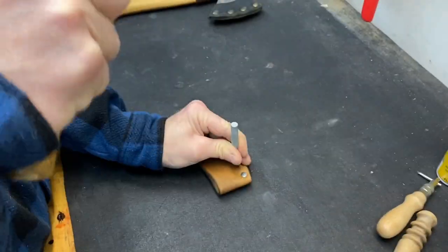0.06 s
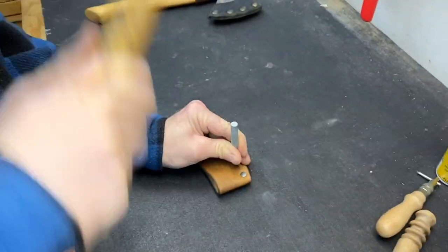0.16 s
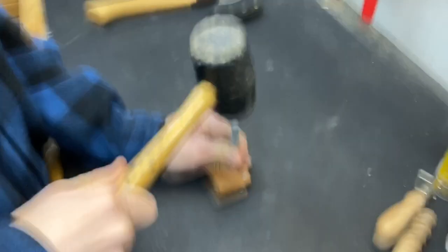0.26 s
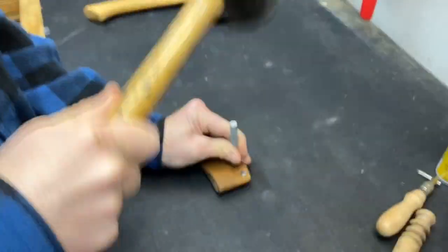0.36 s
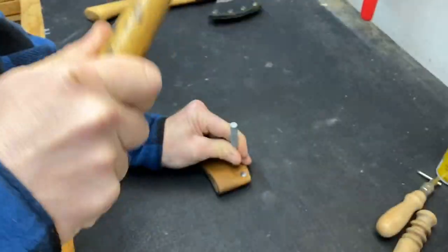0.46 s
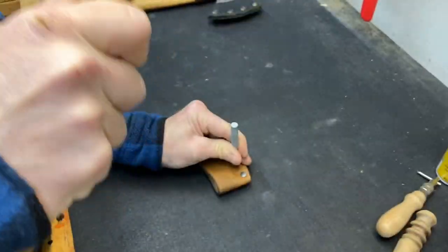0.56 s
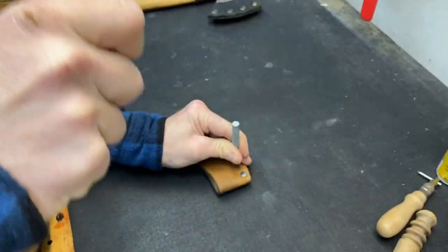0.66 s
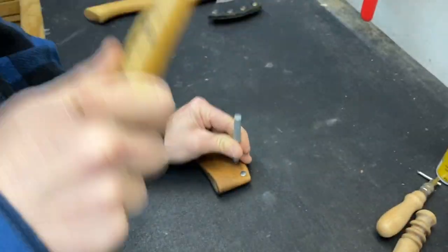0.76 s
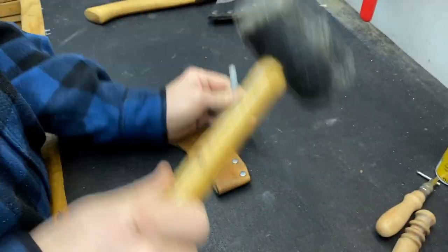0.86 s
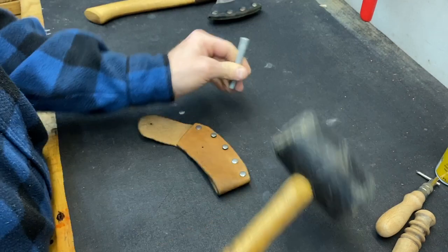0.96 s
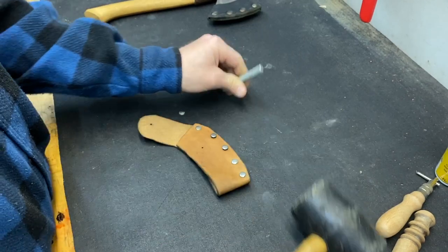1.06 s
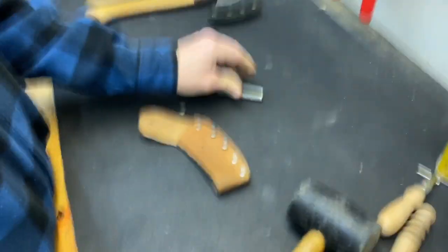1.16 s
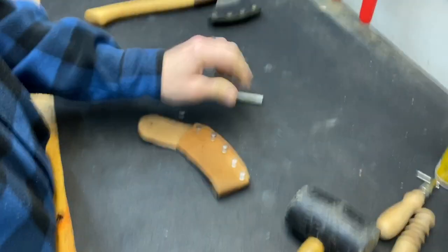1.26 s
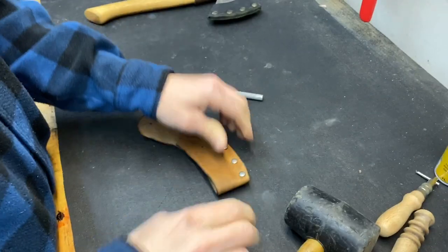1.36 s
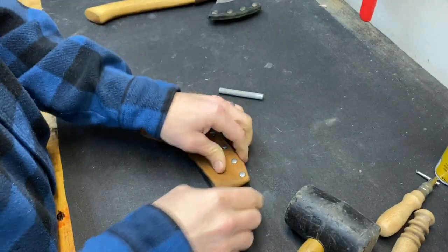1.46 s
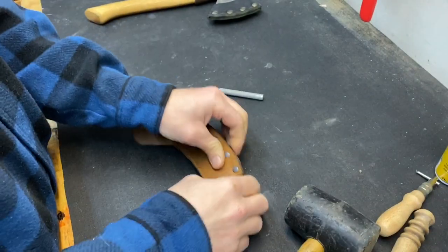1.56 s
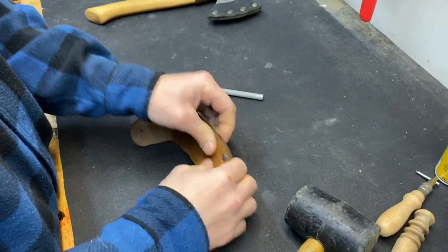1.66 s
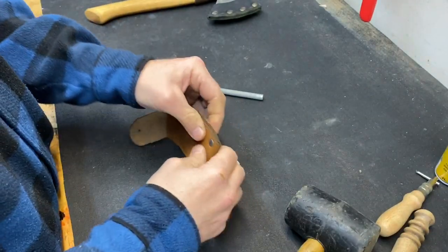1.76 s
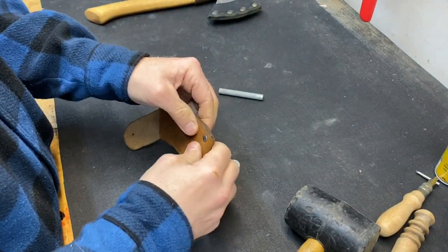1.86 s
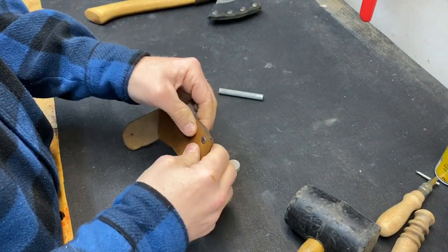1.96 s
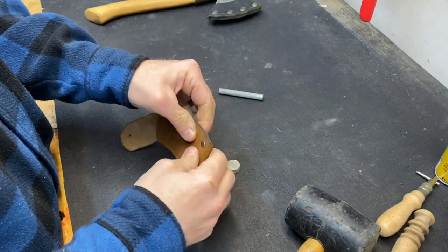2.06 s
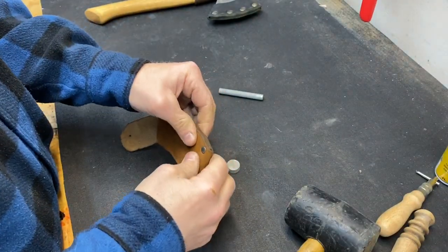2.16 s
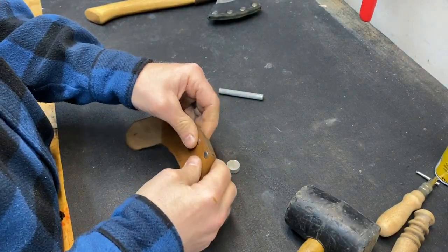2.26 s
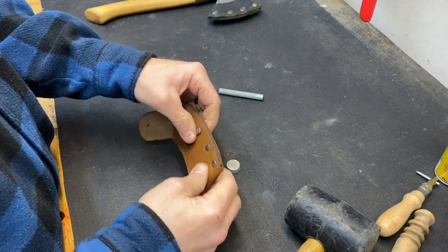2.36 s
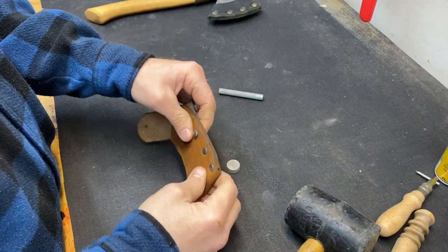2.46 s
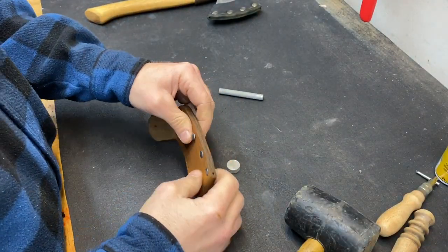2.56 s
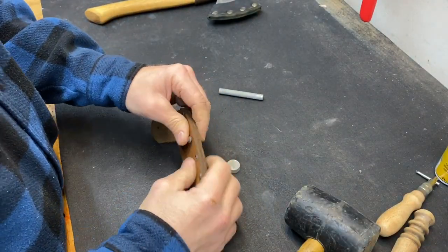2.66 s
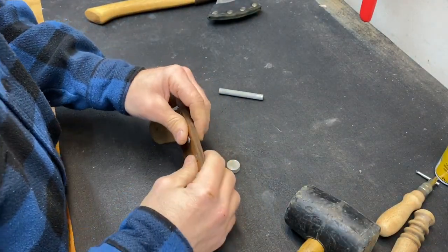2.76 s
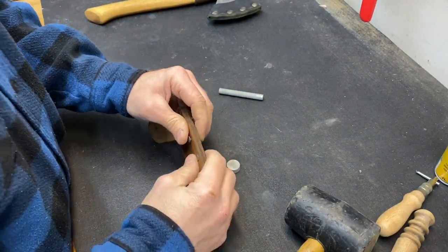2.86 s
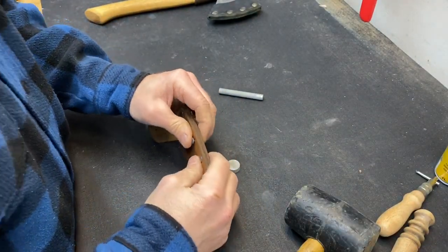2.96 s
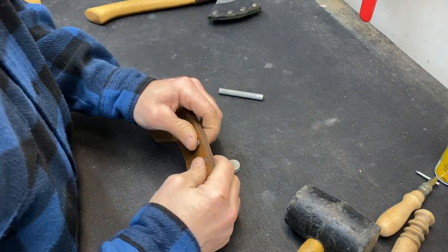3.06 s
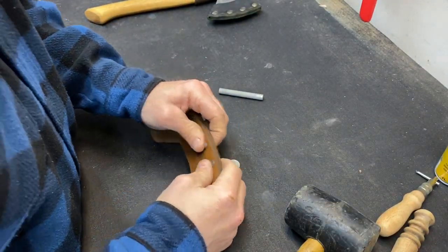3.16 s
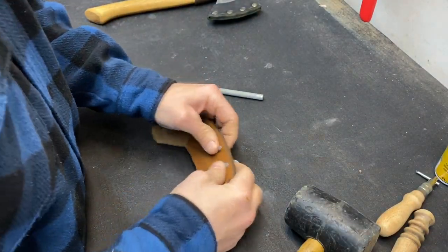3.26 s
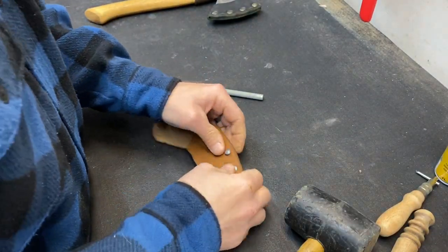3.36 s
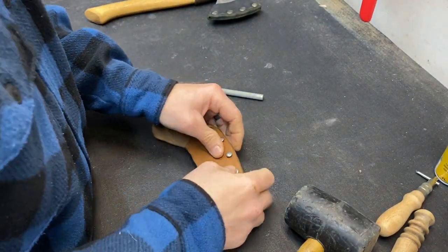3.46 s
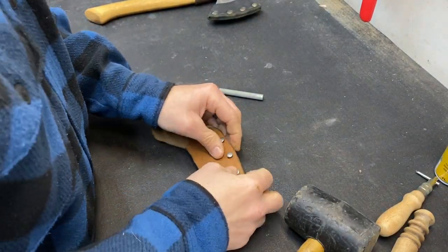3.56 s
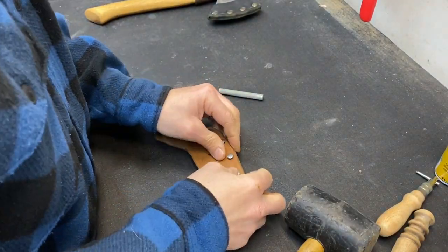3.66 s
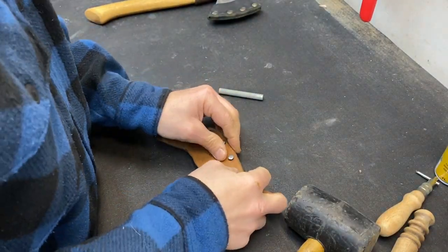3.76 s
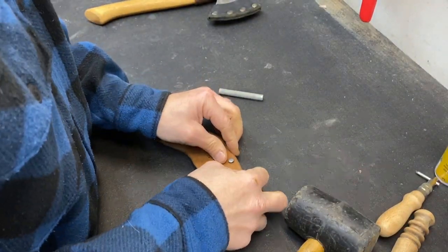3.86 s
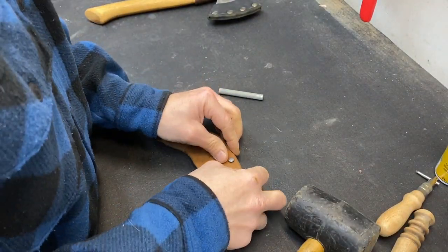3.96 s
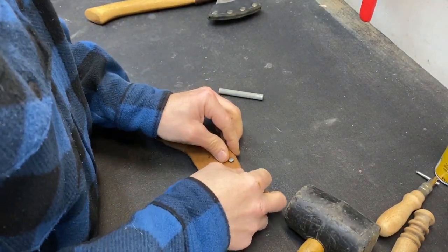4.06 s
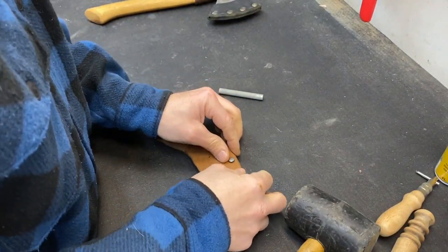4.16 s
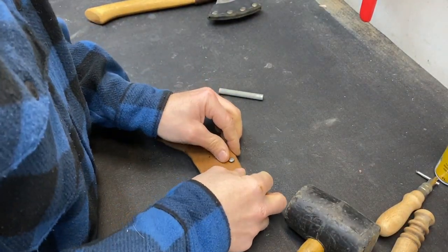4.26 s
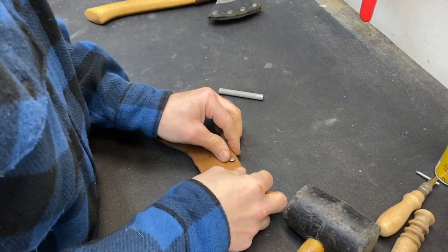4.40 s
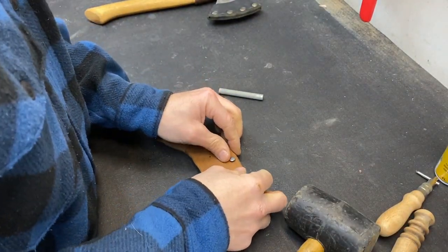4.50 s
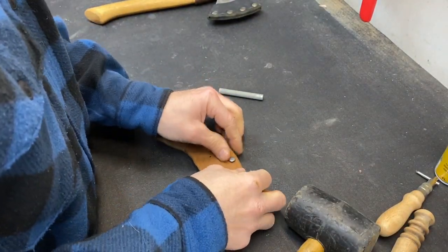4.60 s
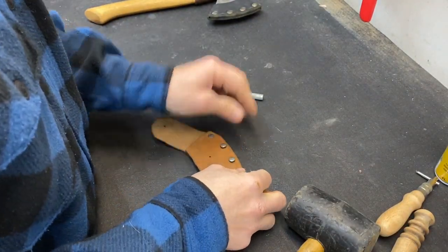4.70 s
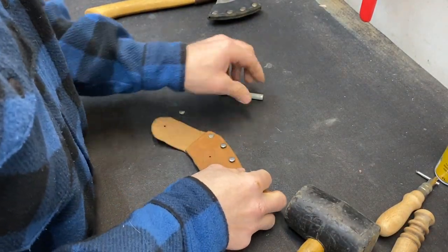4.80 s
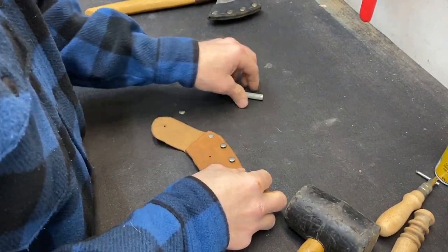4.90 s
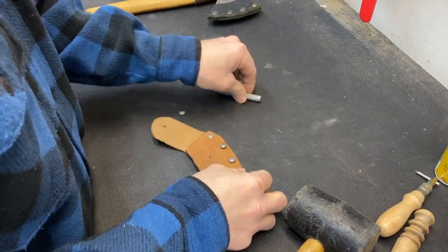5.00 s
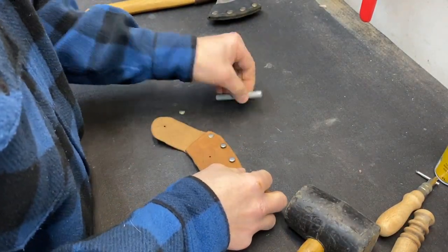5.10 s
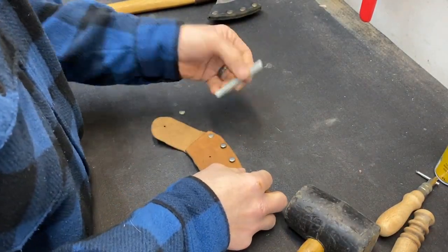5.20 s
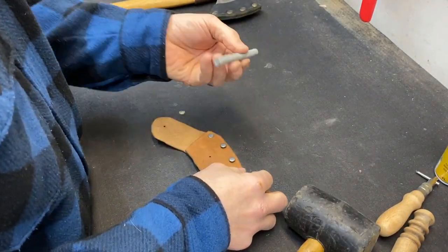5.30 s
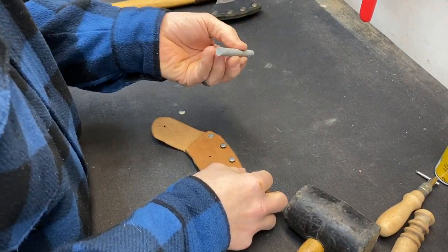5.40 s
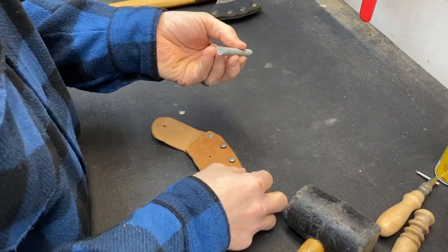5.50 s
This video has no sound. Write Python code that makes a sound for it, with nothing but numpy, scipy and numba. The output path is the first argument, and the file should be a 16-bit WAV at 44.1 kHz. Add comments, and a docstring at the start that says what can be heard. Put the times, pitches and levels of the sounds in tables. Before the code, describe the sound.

A rubber mallet strikes steel once, mallet and steel rod are set down with thuds and a clack, and leather rustles softly.

```python
"""A sharp blow of a rubber mallet on a steel rivet setter, over the dying ring of the blow before.
Mallet and setter are put down on the workbench, leather is handled, sleeves rustle, rivets tick.
Each impact excites the modes of bench and steel; bending waves in the bench top bring the bass last.
Loose tools rattle and the small workshop reverberates over a low drone. The microphone takes its
treble from one port, and a limiter holds down the blow."""
import sys
import numpy as np
from scipy import signal
from scipy.fft import rfft, irfft, next_fast_len
from scipy.io import wavfile
from scipy.ndimage import uniform_filter1d, minimum_filter1d
from numba import njit

SR = 44100
rng = np.random.default_rng(int(sys.argv[2]) if len(sys.argv) > 2 else 0)


def waveform_to_disk(signal):
    """Save audio, clipped to [-1, 1], as 16-bit WAV at the path in sys.argv[1]."""
    frames = np.transpose(np.atleast_2d(signal))
    scaled = np.clip(frames, -1, 1) * 32767
    samples = np.round(scaled).astype(np.int16)
    wavfile.write(sys.argv[1], SR, samples)


N = 244269
RING, ONSET = int(.9 * SR), SR // 50  # samples: length of an impact response, margin before its onset


def undb(db):
    """Amplitude ratio of a level in dB."""
    return 10 ** (np.asarray(db) / 20)


def over_hz(table, hz, col=1):
    """Interpolation of a table column on a logarithmic frequency axis."""
    rows = np.array(table, float)
    return np.interp(np.log(np.maximum(hz, 1)), np.log(rows[:, 0]), rows[:, col])


def unit(x):
    """Normalisation to rms 1."""
    return x / np.sqrt(np.mean(x ** 2))


def fade(t60):
    """Exponential decay by 60 dB in t60 seconds."""
    return np.exp(-np.log(1000) * np.arange(RING) / SR / t60)


def walk(rate):
    """Random modulation: linear ramps between `rate` Gaussian values a second, spread near 1."""
    step = int(SR / rate)
    held = np.repeat(rng.standard_normal(N // step + 1), step)
    return np.sqrt(3 / 2) * uniform_filter1d(held, step)[:N]


def grain(rate, spread_db):
    """Shot-noise envelope: `rate` uneven slips a second, each relaxing exponentially; rms 1."""
    slips = (rng.random(N) < rate / SR) * undb(spread_db * rng.exponential(size=N))
    return unit(signal.lfilter([1], [1, -np.exp(-1 / (0.0041 * SR))], slips))


def after_blow(t, db, delay, attack, hold, db_per_s):
    """Transient envelope timed from the last blow: rise, plateau, exponential decay; times in s."""
    age = t - BLOWS[-1][0] - delay
    return np.clip(age / attack, 0, 1) ** 2 * undb(db - db_per_s * np.maximum(age - attack - hold, 0))


# Likeness of left and right: f/Hz, correlation
COHERENCE = [(60, 0.99), (150, 0.94), (300, 0.2), (700, .4), (1400, 0.61), (3000, 0.49), (6000, 0.43)]
def noise(gain, size=N):
    """Partially coherent stereo noise with amplitude spectrum gain(f), alike in the bass; rms 1."""
    n = next_fast_len(size)
    hz = np.fft.rfftfreq(n, 1 / SR)
    correlation = np.clip(over_hz(COHERENCE, hz), 0, 1)
    mid, side = rfft(rng.standard_normal((2, n))) * gain(hz)
    mid, side = mid * np.sqrt(1 + correlation), side * np.sqrt(1 - correlation)
    return unit(irfft([mid + side, mid - side], n)[:, :size])


# Background spectrum: f/Hz, relative level/dB
DRONE_SPECTRUM = [(15, -45), (25, -19.5), (70, -0.5), (97, 2.5), (121, -5), (172, -19), (280, -31),
                  (483, -30.5), (1010, -46.5), (1220, -38.5), (7110, -53), (8830, -58), (11000, -55),
                  (16500, -62)]
def drone():
    """Ambient noise: an amplitude-modulated building hum under a faint steady hiss."""
    hum = noise(lambda hz: undb(over_hz(DRONE_SPECTRUM, hz)) * (hz < 400))
    hiss = noise(lambda hz: undb(over_hz(DRONE_SPECTRUM, hz)) * (hz >= 400))
    return undb(-65 + 1.5 * walk(13)) * hum + undb(-90.5) * hiss


# Touches of finger or cuff: middle t/s, level/dB, half-length/s, centre f/Hz, ratio of edge to centre f
BRUSHES = [(1.81, -72.5, 0.024, 4960, 2.8), (2.04, -80, .017, 2800, 1.8), (2.135, -86, .02, 3025, 2.2),
           (2.338, -69.5, 0.032, 10950, 2.6), (2.41, -74.5, 0.042, 2940, 1.1),
           (2.432, -73, .025, 8930, 2.2), (2.723, -68.5, .021, 9000, 3.3), (3.002, -78.5, 0.024, 3530, 1.1),
           (3.634, -72.5, 0.014, 5950, 2.4), (3.881, -70.5, 0.03, 3000, 2.1),
           (4.12, -82.5, .034, 2800, 1.6), (4.615, -82.5, 0.028, 2230, 1.7),
           (4.802, -82.5, 0.034, 5580, 2.1), (5.015, -69.5, 0.018, 3540, 1.38),
           (5.334, -80, 0.088, 2950, 1.2)]
def brushes(t):
    """Brief sliding friction: each touch is band-limited noise under a Gaussian envelope."""
    hiss, out = noise(lambda hz: hz > 500), 0
    for middle, db, half_length, hz, ratio in BRUSHES:
        band = signal.butter(1, [hz / ratio, min(hz * ratio, 18000)], "band", fs=SR, output="sos")
        envelope = undb(db) * np.exp(-((t - middle) / half_length) ** 2)
        out = out + envelope * unit(signal.sosfilt(band, hiss))
    return out


# Motion of hands and sleeves: t/s, rustle level/dB, drag level/dB
HAND_MOTION = [(.58, -88.5, -66), (.77, -71, -63.5), (.92, -62, -61.5), (1.02, -66, -65.5),
               (1.25, -65, -67.5), (1.37, -70, -74.5), (1.6, -70.5, -68.5), (1.85, -82, -78.5),
               (2.11, -94, -90.5), (2.39, -69, -80.5), (2.48, -80, -79), (2.61, -75, -79.5),
               (2.98, -83, -81.5), (3.15, -94, -84), (3.26, -78.5, -80), (3.36, -73.5, -77),
               (3.46, -74, -77), (3.58, -87, -81.5), (3.67, -76, -86), (3.78, -84, -87), (3.92, -99, -100),
               (4.7, -100, -92), (5.1, -83, -83.5), (5.28, -72, -77.5), (5.54, -80.5, -77)]
# Cloth spectrum: f/Hz, relative level/dB
CLOTH_SPECTRUM = [(700, -12), (1300, -8), (2200, -7), (3000, 0), (3600, -7), (4500, -4), (5600, -9),
                  (7500, -9), (11000, -9), (14500, -8), (16500, -19)]
def cloth_and_leather(t):
    """Stick-slip friction: cloth hisses and leather drags dully, moved by the hands and by the blow."""
    times, *levels = np.transpose(HAND_MOTION)
    rustle, drag = (undb(np.interp(t, times, db, left=-150)) for db in levels)
    # the blow makes small things shiver on the mat; leather and mat then slide to rest
    shiver = after_blow(t, db=-52, delay=-0.02, attack=0.0063, hold=0.1254, db_per_s=137.5)
    slide = after_blow(t, db=-46, delay=0.09, attack=0.12, hold=0.0231, db_per_s=154)
    cloth = noise(lambda hz: undb(over_hz(CLOTH_SPECTRUM, hz)) * (hz > 700)) * grain(5000, 0.84)
    leather = noise(lambda hz: (hz / 300) ** 2 / (1 + (hz / 300) ** 3.8) / (1 + (hz / 1200) ** 3))
    return ((rustle + shiver) * undb(1.2 * walk(17)) * cloth
            + (drag + slide) * undb(1.2 * walk(40)) * leather)


# Resonances of a small scraping object: f/Hz, half-width/Hz, relative level/dB
SCRAPE_RESONANCES = [(650, 100, -3), (1940, 190, -1.5), (2690, 50, -1), (2930, 60, -7)]
# Course of the scrape: t/s, level/dB
SCRAPE_LEVEL = [(.58, -93), (.64, -74), (.77, -76.5), (.86, -60.5), (1.0, -61.5), (1.27, -64),
                (1.37, -72.5), (1.55, -76.5), (1.7, -73), (1.78, -93)]
def scrape(t):
    """Friction-driven resonance: something small scrapes and rings while the tools are moved."""
    ring = noise(lambda hz: sum(undb(db) / (1 + ((hz - f) / width) ** 2)
                                for f, width, db in SCRAPE_RESONANCES))
    envelope = undb(np.interp(t, *np.transpose(SCRAPE_LEVEL), left=-150, right=-150))
    return envelope * undb(2.5 * walk(26)) * ring


def rattle(t):
    """Contact chatter: loose tools jump on the shaken bench in a dense burst of small collisions."""
    bright = noise(lambda hz: (hz > 1200) * (hz + 1) ** -.2)
    envelope = after_blow(t, db=-32, delay=0.0171, attack=0.0128, hold=0.0489, db_per_s=480.5)
    return envelope * grain(4000, 0.65) * bright


# Reverberant tail of the workshop: f/Hz, relative level/dB, T60/s
ROOM = [(59.3, -33.5, 0.99), (118, -29, 0.75), (248, -35.5, 0.31), (500, -27, 0.18), (990, -23.5, 0.4),
        (2000, -24.5, 0.23), (4000, -27, 0.36), (8000, -30, 0.26), (14470, -28, 0.39)]
def reverberation():
    """Diffuse reflection, octave by octave: early scatter off bench and wall, then a slower tail."""
    build_up = 1 - fade(t60=0.043)  # echoes need a moment to arrive
    early, out = undb(13) * fade(t60=0.068), 0
    for centre in 45 * 2 ** np.arange(9):
        band = noise(lambda hz: np.exp(-(np.log2((hz + 1) / centre) / 0.84) ** 2), size=RING)
        decay = early + fade(over_hz(ROOM, centre, col=2))
        out = out + undb(over_hz(ROOM, centre)) * np.sqrt(centre / SR) * band * build_up * decay
    return out


# Crossovers between seven bands (boom, thump, knock, tap, clack, tick, edge): f/Hz
BAND_EDGES = [110, 290, 580, 1000, 3200, 7000]
def dispersed_bands(response):
    """Dispersion: bending waves travel slower in the bass; the delayed response is split into bands."""
    hz = np.fft.rfftfreq(RING, 1 / SR)
    group_delay = ONSET / SR + 0.0017 * (np.maximum(hz, 70) / 1000) ** -0.96  # s
    taper = np.clip(np.linspace(3, -.3, RING), 0, 1) ** 2
    delayed = rfft(response * taper) * np.exp(-2j * np.pi * np.cumsum(group_delay) * hz[1])
    lowpasses = [0 * hz] + [1 / (1 + (hz / edge) ** 10) for edge in BAND_EDGES] + [1 + 0 * hz]
    return np.array([taper * irfft(delayed * band, RING) for band in np.diff(lowpasses, axis=0)])


# Modes of the unloaded bench: f/Hz, relative level/dB, T60/s
BENCH_MODES = [(57, 0, .25), (94.4, 3, 0.099), (130.7, -3, 0.29), (168.3, 1, 0.21), (232, -19, 0.25),
               (338.65, -10.5, .2), (454.6, -18.5, 0.47), (512, -14, 0.24), (538, -14.5, 0.21),
               (729, -6, .15), (780, -10.5, 0.088), (908, -14, .4), (994, -18, 0.22), (1180, -23.5, .2)]
# Modes of setter and rivets: f/Hz, relative level/dB, T60/s
STEEL_MODES = [(1362, -35, .06), (2232, -33.5, 0.041), (3530, -34.5, 0.031), (5150, -25, 0.021),
               (7530, -32, 0.0067), (9700, -30.5, 0.033)]
def bench_response():
    """Modal superposition: an impulse gives a click and the damped vibrations of bench and steel."""
    t = np.arange(RING) / SR
    bench_db, t60_share = -41.5, 0.94  # hands and tools damp the bench
    bench = sum(undb(bench_db + db) * np.cos(2 * np.pi * f * t) * fade(t60 * t60_share)
                for f, db, t60 in BENCH_MODES)
    steel = sum(undb(db) * np.sin(2 * np.pi * f * t) * fade(t60) for f, db, t60 in STEEL_MODES)
    return bench + steel + (t == 0)


def crack():
    """Contact noise: a splintery, rapidly decaying burst at the point of impact."""
    return undb(-15) * fade(t60=0.019) * noise(lambda hz: hz > 500, size=RING)


BLOW_ECHO_DB = -2
# Impacts: t/s, level/dB, hardness/(dB per band), relative echo level/dB
# Their spectra: relative level/dB in each of the seven bands
BLOWS, BLOW_SPECTRUM = [(-0.18, 0, 0, BLOW_ECHO_DB), (0.2669, 0, 0, BLOW_ECHO_DB)], [-7, -2.5, -6.5, -6.5, -14.5, -20, -17]  # mallet on setter
THUDS, THUD_SPECTRUM = [(1.1246, -9, -2, -1.3), (1.217, -22.5, .4, -16), (1.504, -49, 3, -5),
                        (1.532, -43.5, -2.5, -4), (3.8839, -40, .8, -5.5), (3.906, -45.5, -2.5, -3)], [0, -1, -13, -20, -24, -36, -43]  # rubber head and knuckles
BUMPS, BUMP_SPECTRUM = [(4.957, -37, -1.4, 3), (4.991, -40, 0.7, 5.4)], [0, -12, -37, -37, -54, -54, -53.5]  # soft palm
KNOCKS, KNOCK_SPECTRUM = [(1.135, -35, -2, 4), (1.212, -26, -0.25, -4), (1.2185, -29.5, 0.7, -11.5),
                          (1.278, -43, 0, -3.5), (1.876, -63, -5, -2), (2.056, -68.5, -6, -3)], [-15.5, -13.5, 0.5, 1, -4.5, -14, -31]  # handle and leather edge
CLACKS, CLACK_SPECTRUM = [(1.301, -15.5, .3, -6.5), (1.327, -36, -.6, -4.5), (1.636, -57.5, -1.5, -7),
                          (1.702, -66, 1, -5), (3.18, -51, 9.5, -2.5), (3.74, -70, -0.5, -11.5),
                          (3.8839, -50, 0, -10)], [-16, -8.5, -7, -7.5, 0, -8.5, -19]  # steel bouncing on the bench
TICKS, TICK_SPECTRUM = [(1.135, -37, 1.5, 7), (1.532, -45, 7, -9), (2.912, -63, -2, -9),
                        (2.928, -58.5, -1.5, -16), (3.1193, -42.5, -4.5, -9), (3.17, -19, 0.1, -18),
                        (3.284, -62, 6, -14), (3.333, -47, 8, -8), (3.8839, -46, 4, -12)], [-50, -48, -50, -48, -26.5, -9, 0]  # rivet heads touching
def impacts():
    """Impact excitation: each contact drives bench and room; the harder it is, the more treble it has."""
    direct = dispersed_bands(bench_response())[:, None]
    band_peaks = np.abs(direct).max(axis=(1, 2))
    cracks = [dispersed_bands(crack()) for _ in range(4)]
    echoes = [dispersed_bands(reverberation()) for _ in range(4)]
    lead = SR // 2  # room for the blow before t = 0
    out = np.zeros((2, lead + N + RING))
    kinds = [(BLOWS, BLOW_SPECTRUM, 0), (THUDS, THUD_SPECTRUM, 0), (BUMPS, BUMP_SPECTRUM, 0),
             (KNOCKS, KNOCK_SPECTRUM, 2), (CLACKS, CLACK_SPECTRUM, 4), (TICKS, TICK_SPECTRUM, 6)]
    for events, spectrum, pivot_band in kinds:
        for k, (time, db, hardness, echo_db) in enumerate(events):
            start = lead - ONSET + int(time * SR)
            tilt_db = hardness * (np.arange(len(spectrum)) - pivot_band)
            gains = undb(db + np.array(spectrum) + tilt_db) / band_peaks
            response = direct + cracks[k % 4] + undb(echo_db) * echoes[k % 4]
            out[:, start:start + RING] += np.tensordot(gains, response, axes=1)
    return out[:, lead:lead + N]


def scene():
    """Linear superposition of everything on and around the bench."""
    t = np.arange(N) / SR
    return impacts() + rattle(t) + scrape(t) + cloth_and_leather(t) + brushes(t) + drone()


@njit
def follow(x, attack_s, release_s):
    """Envelope detection: a first-order lag with separate time constants for rise and fall."""
    level, out = 0., np.empty(len(x))
    for i in range(len(x)):
        level += (x[i] - level) / (SR * (attack_s if x[i] > level else release_s))
        out[i] = level
    return out


# Channel imbalance: f/Hz, left minus right level/dB
IMBALANCE = [(100, 0.86), (400, 2.4), (800, 3), (2400, 3), (4400, 6.4), (6500, 1.2)]
def record(dry):
    """Transduction: left favours the mids, one port feeds both sides' treble; limiter and top cut."""
    one_port_hz, in_phase_hz, full_turn_hz, top_hz = 6300, 6800, 4400, 16500
    n = next_fast_len(N + 4096)
    hz = np.fft.rfftfreq(n, 1 / SR)
    left, right = rfft(dry, n) * hz ** 2 / (hz ** 2 + 40 ** 2)  # little deep bass gets in
    lean = undb(over_hz(IMBALANCE, hz) / 2)
    left, right = left * lean, right / lean
    port_share = np.clip((hz - one_port_hz) / 800 + .5, 0, 1)
    shifted_left = left * np.exp(2j * np.pi * (hz - in_phase_hz) / full_turn_hz)
    right = np.sqrt(1 - port_share) * right + np.sqrt(port_share) * shifted_left
    stereo = irfft([left, right], n)[:, :N]
    peak = -minimum_filter1d(-np.abs(stereo).max(axis=0), size=89)  # looks a millisecond ahead
    held = follow(peak, attack_s=0.00063, release_s=0.013)
    limited = stereo * np.minimum(1, .88 / (held + 1e-9))
    return signal.sosfilt(signal.ellip(10, .2, 80, top_hz, fs=SR, output="sos"), limited)


dry = scene()
out = record(dry)
waveform_to_disk(out)
```